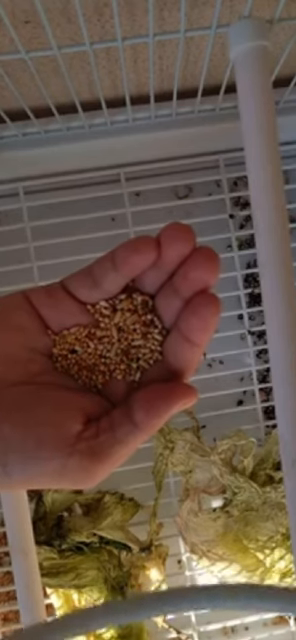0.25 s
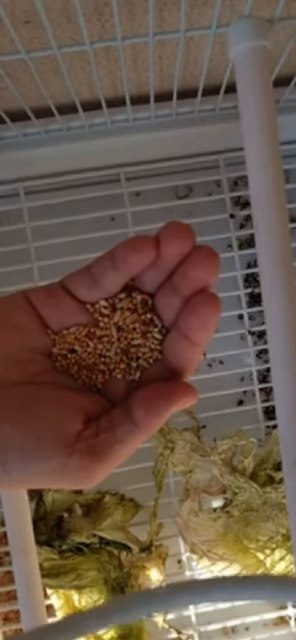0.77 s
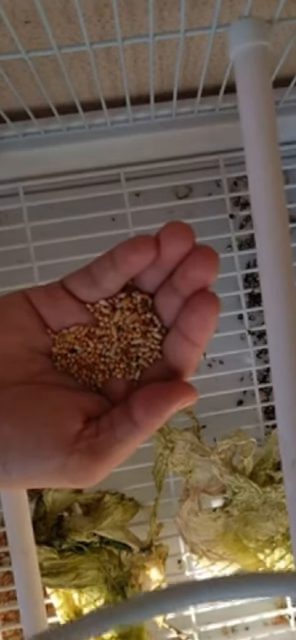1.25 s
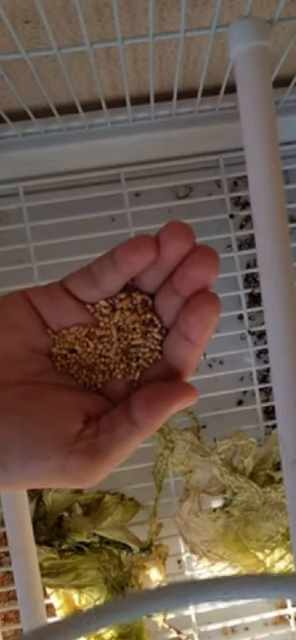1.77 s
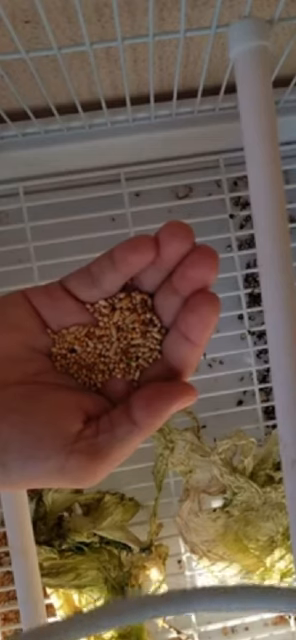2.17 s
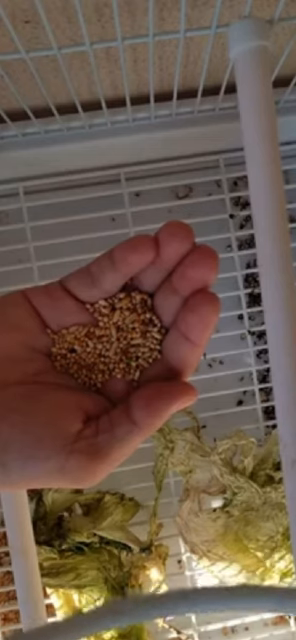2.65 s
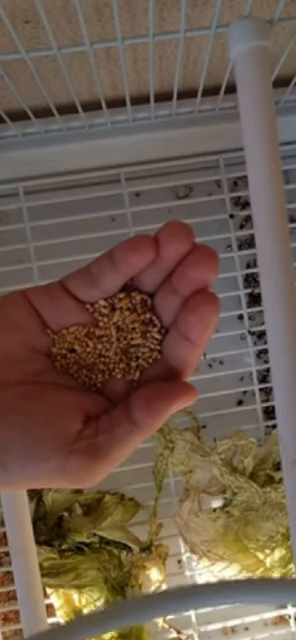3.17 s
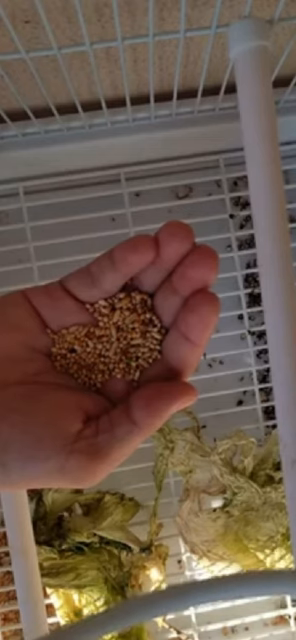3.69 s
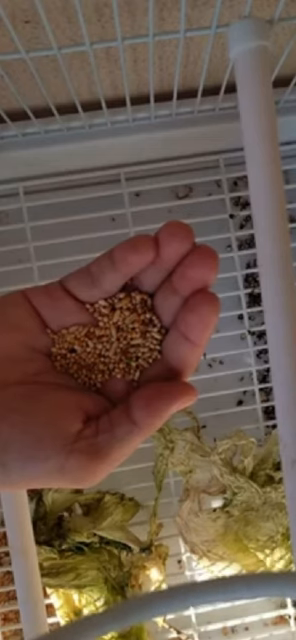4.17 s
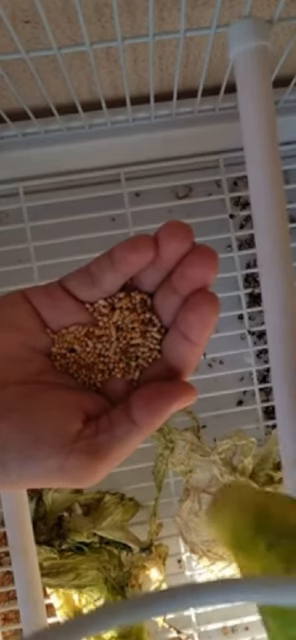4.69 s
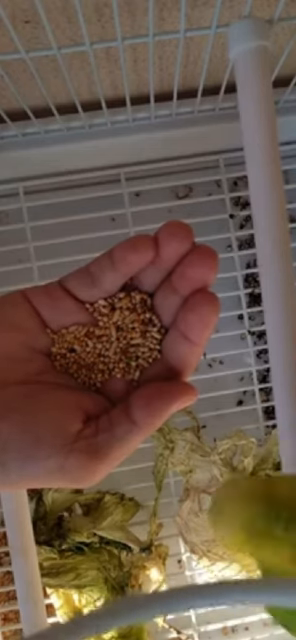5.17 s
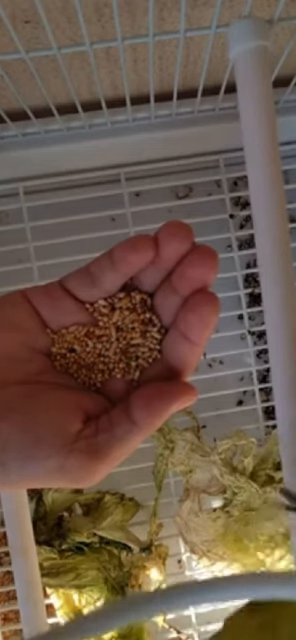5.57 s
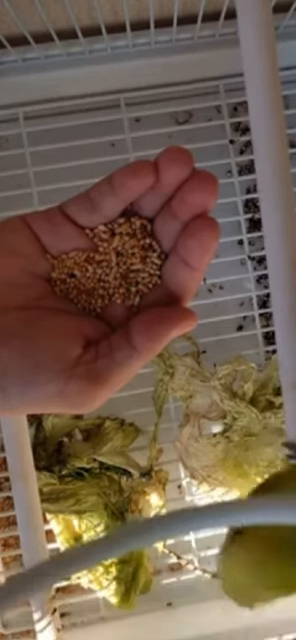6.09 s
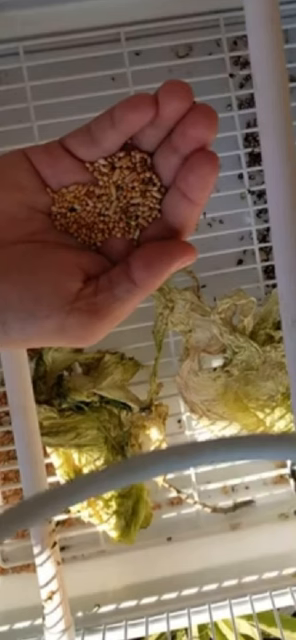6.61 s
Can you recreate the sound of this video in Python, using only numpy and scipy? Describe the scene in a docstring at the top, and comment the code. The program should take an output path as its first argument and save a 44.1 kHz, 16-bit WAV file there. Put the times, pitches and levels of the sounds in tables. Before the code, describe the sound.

Close in a small room, a budgie calls six times with quiet gaps between. A faint whistle and a light tap on the wire cage come first, then a falling raspy double chirp, a buzzy squawk, three more double chirps and a final squawk. Soft thin whistles sound farther off. Underneath lie low hum, a far engine note and distant traffic, slowly swelling.

```python
"""A small room, where a budgie calls six times in a wire cage, with thin soft whistles, and one tap
before the first call. Four calls are falling double chirps that break into rasp where the syrinx
(voice organ) runs unstable; two are buzzy rising squawks. Calls are gliding tones mixed with noisy rasp.
Behind lie a low hum, a far engine note and the slowly swelling rumble of distant traffic, made of
shaped noise and sine waves. A dull shuffle of noise surrounds the tap."""
import sys
import numpy as np
from scipy import signal
from scipy.fft import rfft, irfft, next_fast_len
from scipy.io import wavfile
from scipy.ndimage import uniform_filter1d

SR = 44100
rng = np.random.default_rng(int(sys.argv[2]) if len(sys.argv) > 2 else 0)


def unload_audio(sound):
    """Save the sound as a 16-bit wav file, at the path given as the first command line argument."""
    columns = np.transpose(np.atleast_2d(sound))
    # keep every value between -1 and 1, then stretch to whole-number steps
    steps = np.round(np.clip(columns, -1, 1) * 32767)
    wavfile.write(sys.argv[1], SR, steps.astype(np.int16))


N = 302085
TIME = np.arange(N) / SR

# Colours of noise are relative, since noise is evened to one strength: pitch_hz, level_db (per Hz)
DEEP_COLOUR = [(15, -48), (35, -25), (50, -12), (68, 1), (95, 0.5), (125, -23), (250, -70.5)]
RUMBLE_COLOUR = [(50, -43.5), (95, -14.5), (122, 1), (170, -2.5), (200, 1), (240, 0.5), (285, -3.5),
                 (335, -9.5), (420, -17.5), (550, -44), (900, -95)]
AIR_COLOUR = [(190, -45), (330, 0), (394, -4), (416, -5.5), (452, 0), (555, -4.5), (602, -1), (681, -8.5),
              (883, -6), (1480, -13), (2090, -12), (2630, -16.5), (4680, -25.5), (7050, -27), (8650, -48.5),
              (11200, -77.5), (19000, -120)]
SHUFFLE_COLOUR = [(80, -20), (180, -2), (300, 2), (600, -12), (1500, -23), (4000, -32), (8000, -51)]
TAP_COLOUR = [(500, -18), (1000, -3), (1500, 6), (2100, -3.5), (3700, -5), (7000, -12), (8600, -40)]
RASP_COLOUR = [(900, -36), (1300, -11), (1700, 6.5), (2300, 5), (3300, 6), (3900, 0.5), (4500, -23.5),
               (5800, -17.5), (7200, -12.5), (8000, -32), (9000, -40)]
# Background levels, swelling slowly with one brief sag near the end; before a small trim:
# time_s, rumble_db, tyre_and_air_db
BACKGROUND_SWELL = [(0, -41, -47), (1.5, -40.5, -45.5), (3.4, -39.5, -46.5), (4.3, -40, -44),
                    (5.1, -36.5, -42.5), (6.0, -36, -40.5), (6.5, -34.5, -40.5), (6.66, -42.5, -44.5),
                    (6.8, -32.5, -38.5)]
# Humming lines, levels relative to the rumble: pitch_hz, level_db
HUM_LINES = [(123, -13.5), (243, -10), (335, -26), (392, -17.5), (605, -27.5)]
# A far engine, before its waver: time_s, pitch_hz, level_db
ENGINE_PATH = [(0, 250, -54.5), (3.6, 252, -53), (4.0, 268, -39), (4.4, 281, -45), (5.0, 279, -46.5),
               (5.9, 273, -36.5), (6.4, 272.6, -42), (6.85, 272, -50)]
# Soft whistles, levels before flutter and distance: start_s, length_s, first_hz, last_hz, level_db,
# quaver (share of pitch)
WHISTLE_NOTES = [(0.576, 0.072, 7000, 7700, -54.5, 0.051), (1.54, 0.039, 4180, 4620, -52, 0.0366),
                 (1.582, 0.075, 5880, 5800, -51.5, 0.014), (1.734, 0.14, 3795, 3900, -47.5, .005),
                 (1.791, 0.2, 6570, 6800, -58, 0.0647), (1.891, 0.13, 3900, 3920, -53.5, 0.026),
                 (2.003, 0.14, 3900, 4020, -58.5, 0.024), (4.758, .06, 4210, 3910, -45.5, 0.031),
                 (4.801, 0.071, 3892, 4020, -54, 0.06), (4.9, 0.071, 4320, 4100, -57, 0.04),
                 (5.33, 0.068, 7164, 6400, -54, 0.029), (5.469, 0.087, 4100, 4100, -50, 0.043)]
# A tap on the cage, before a trim: start_s, level_db
TAP_HITS = [(0.699, -26.5)]
# Gain of throat and beak for the overtones, beak narrow and then wide open: pitch_hz, gain_db
NARROW_BEAK = [(3300, -13), (4100, -13.5), (4800, -35), (6200, -36), (6750, -21), (7300, -24), (7900, -44),
               (9500, -65)]
OPEN_BEAK = [(3300, -13.5), (4000, -9), (4500, -14.5), (5100, -23), (5600, -24), (6300, -17), (7300, -17),
             (8200, -45), (9500, -50)]
# Falling strokes, two to a chirp: rasp, a clear gliding tone, rasp again. Levels before the voice trims:
# tone_start_s, glide_length_s, first_hz, last_hz, tone_db, swell_over_glide_db, opening_rasp_db, closing_rasp_db
CHIRP_STROKES = [(0.995, .030, 3500, 2400, -17.5, -3, -28, -20.5),
                 (1.056, .032, 2563, 2276, -22, 8, -32, -22.5),
                 (2.693, .028, 3450, 2420, -18.5, 15, -25, -18.5),
                 (2.758, .023, 2594, 2400, -15, 1.5, -32.5, -17.5),
                 (4.229, 0.029, 3480, 2420, -20.5, 2, -27, -20),
                 (4.283, .040, 3200, 2330, -21, 1, -14.5, -18),
                 (5.147, 0.032, 3520, 2520, -17.5, 1.5, -25.5, -19.5),
                 (5.212, 0.032, 2780, 2400, -17.5, 2.5, -23, -16.5)]
# Notes of two squawks, from a low start through a buzzy middle to a clear high end. Levels before voice trims:
# start_s, length_s, first_hz, last_hz, level_db, roughness (0-1)
SQUAWK_NOTES = [(2.166, 0.0091, 1840, 1730, -23.5, .18), (2.182, 0.0105, 2830, 2630, -14, 0.3),
                (2.198, 0.01524, 2520, 2380, -13.5, 0.3), (2.224, .014, 2620, 2703, -14, 0.26),
                (2.246, 0.038, 3250, 2975, -17.5, 0.07), (6.552, 0.012, 2130, 1950, -23.5, 0.25),
                (6.57, .007, 2620, 2680, -12.5, 0.37), (6.581, 0.024, 2450, 2105, -15.5, 0.45),
                (6.614, 0.012, 2480, 2760, -12.5, 0), (6.632, 0.031, 3260, 2960, -18, 0)]
# Reflections from the cage tray and the near wall: delay_s, gain (plain factor)
NEAR_ECHOES = [(.0031, 0.052), (.0074, 0.26), (0.0128, 0.27), (0.0216, .15), (.034, 0.08)]
# Cage wires that ring along: pitch_hz, t60_s (time to fall 60 dB), gain at resonance (plain factor)
CAGE_WIRES = [(2310, 0.7, 0.6), (3080, 0.45, .55), (2020, .45, .25)]
# Brief dips in the level: start_s, end_s, level_db
LEVEL_DIPS = [(4.2632, 4.277, -49), (5.058, 5.086, -11)]

DEEP_DB, DEEP_WAVER_DB = -47, 2
SHUFFLE_S, SHUFFLE_WIDTH_S, SHUFFLE_DB = 0.676, 0.09, -37
PULSE_HZ, PULSE_SPREAD = 181.9, 0.284   # flutter of the airflow in a rough call
TONE_FLUTTER_HZ, TONE_FLUTTER_DB = 254, 2   # even a clear tone trembles in strength
OPENING_S, OPENING_ROUGH, OPENING_HZ = 0.018, 0.845, 2612   # the rasp before the tone locks in
LOCK_S = 0.005   # the switch from rasp to tone
GLIDE_ROUGH, GLIDE_BEND = 0.082, 1.4   # a higher bend makes the pitch fall earlier
BREAK_S = 0.00583   # the tone collapses into a low rasp
CLOSING_S, CLOSING_ROUGH, CLOSING_HZ, CLOSING_SAG_DB = 0.016, 0.83, 1846, 4
ATTACK_DB_PER_S, RELEASE_DB_PER_S = 2195, 2001
NOTE_EDGE_DB_PER_S, NOTE_SAG_DB = 2400.5, 1.5   # how fast a note starts and stops; its loss while held
EDGE_S = 0.015   # time allowed for a note to rise and to die
ROOM_T60_S, ROOM_DB = 0.22, -11.5
CUTOFF_HZ = 8800


def from_db(db):
    """Decibels to gain."""
    return 10 ** (np.asarray(db) / 20)


def rms_one(x):
    """Scale to unit power."""
    return x / np.sqrt(np.mean(x ** 2) + 1e-20)


def in_time(rows, t):
    """Read each column of a curve at the times t."""
    seconds, *columns = np.transpose(rows)
    return [np.interp(t, seconds, column) for column in columns]


def gain_at(spectrum, hz):
    """Gain of a spectrum at any pitch, read along a logarithmic pitch scale."""
    points = np.array(spectrum)
    return from_db(np.interp(np.log(np.maximum(hz, 1)), np.log(points[:, 0]), points[:, 1]))


def coloured(x, spectrum):
    """Strengthen and weaken the pitches in x by a spectrum, then scale to unit power."""
    hz = np.fft.rfftfreq(len(x), 1 / SR)
    return rms_one(irfft(rfft(x) * gain_at(spectrum, hz), len(x)))


def noise(spectrum, size):
    """Random noise of a given colour."""
    return coloured(rng.standard_normal(next_fast_len(size)), spectrum)[:size]


def drift(rate_hz, size):
    """Smooth chance movement with spread 1: noise with its fast changes weakened."""
    padded = next_fast_len(size + SR // 10)
    hz = np.fft.rfftfreq(padded, 1 / SR)
    smooth = rfft(rng.standard_normal(padded)) / (1 + (hz / rate_hz) ** 2)
    return rms_one(irfft(smooth, padded))[:size]


def phase_of(hz):
    """Running phase of a moving pitch."""
    return 2 * np.pi * np.cumsum(hz) / SR


def deep_drone():
    """Very low noise whose level wavers a little."""
    return from_db(DEEP_DB + DEEP_WAVER_DB * drift(5.1, N)) * noise(DEEP_COLOUR, N)


def hum(waver=0.01178, throb_db=3.5):
    """Low sine waves, each wavering in pitch and throbbing in strength."""
    total = np.zeros(N)
    for hz, level_db in HUM_LINES:
        throb = from_db(level_db + throb_db * drift(5.1, N))
        pitch = hz * (1 + waver * drift(5.1, N))
        total += throb * rms_one(np.sin(phase_of(pitch)))
    return total


def traffic(rumble_gain_db=-0.5, air_gain_db=1.5):
    """Rumble and hiss of far traffic as two shaped noises; the hum swells along with the rumble."""
    rumble_db, air_db = in_time(BACKGROUND_SWELL, TIME)
    rumble = from_db(rumble_db + rumble_gain_db) * (noise(RUMBLE_COLOUR, N) + hum())
    air = from_db(air_db + air_gain_db) * noise(AIR_COLOUR, N)
    return rumble + air


def far_engine(waver=0.0041, throb_db=3.5):
    """One sine wave that follows the engine's pitch and strength, wavering in both."""
    pitch, level_db = in_time(ENGINE_PATH, TIME)
    throb = from_db(level_db + throb_db * drift(1.1, N))
    return throb * np.sin(phase_of(pitch * (1 + waver * drift(6, N))))


def shuffle():
    """A soft, low rustle: noise that swells and fades."""
    swell = np.exp(-((TIME - SHUFFLE_S) / SHUFFLE_WIDTH_S) ** 2)
    return from_db(SHUFFLE_DB) * swell * noise(SHUFFLE_COLOUR, N)


def whistles(flutter_db=6.5):
    """Thin sine notes before and between the calls, quavering in pitch and fluttering in strength."""
    out = np.zeros(N)
    for start, length, first_hz, last_hz, level_db, quaver in WHISTLE_NOTES:
        at, size = int(start * SR), int(length * SR)
        pitch = np.linspace(first_hz, last_hz, size) * (1 + quaver * drift(300, size))
        swell = signal.windows.tukey(size, 0.5) * from_db(level_db + flutter_db * drift(60, size))
        out[at:at + size] += swell * np.sin(phase_of(pitch))
    return out


def tap(t60_s=0.11, level_db=-7.5):
    """A light knock sets the cage rattling: noise that starts at once and dies away."""
    shake = np.zeros(N)
    for start, hit_db in TAP_HITS:
        fade_db = 60 * np.abs(TIME - start) / t60_s
        shake += (TIME >= start) * from_db(hit_db + level_db - fade_db)
    return shake * noise(TAP_COLOUR, N)


def rasp_of(size, slap_hz=700, unevenness=0.3, hiss=0.55, smear_s=0.0015):
    """The membranes slap at uneven intervals; each slap rings briefly in the throat, at an even strength."""
    slap_rate = slap_hz * np.exp(unevenness * drift(400, size))
    slaps = np.diff(np.floor(np.cumsum(slap_rate) / SR), prepend=0)
    t = TIME[:SR // 200]
    ring = rng.standard_normal(len(t)) * np.exp(-t / smear_s)
    burst = rms_one(signal.fftconvolve(slaps, ring)[:size]) + hiss * rng.standard_normal(size)
    burst = coloured(burst, RASP_COLOUR)
    power = uniform_filter1d(uniform_filter1d(burst ** 2, size=120), size=120)
    return burst / np.sqrt(power + 1e-6)   # even out the strength


def syrinx(phase, pitch, beak, third_db):
    """A tone whose overtones flare as they slide through the beak resonances."""
    second = gain_at(beak, 2 * pitch) * np.sin(2 * phase)
    third = from_db(third_db) * gain_at(beak, 3 * pitch) * np.sin(3 * phase)
    return np.sin(phase) + second + third


def call(gesture, beak, buzz_hz, swing, jitter, rough_jitter, pulsing_db, third_db, rasp_db, tone_db,
         buzz_spread=0.2474):
    """A gliding tone. As it turns unstable it pulses, a slower vibration adds sidebands, and rasp takes over."""
    at, pitch, level_db, rough = gesture
    size = len(at)
    rough = np.clip(rough, 0, 1)
    pitch = pitch * (1 + (jitter + rough_jitter * rough) * drift(349, size))
    buzz = np.sin(phase_of(buzz_hz * np.exp(buzz_spread * drift(211, size))))
    pulses = np.sin(phase_of(PULSE_HZ * np.exp(PULSE_SPREAD * drift(180, size))))
    tremble = rms_one(from_db(TONE_FLUTTER_DB * drift(TONE_FLUTTER_HZ, size)))
    phase = phase_of(pitch) + swing * rough * buzz   # the buzz shakes the phase
    tone = tremble * syrinx(phase, pitch, beak, third_db)
    clear = from_db(tone_db) * np.sqrt(2 - rough - rough ** 2) * tone   # gone at full roughness
    rasp = from_db(rasp_db) * rough * rasp_of(size)
    out = np.zeros(N)
    out[at] = from_db(level_db + pulsing_db * np.cbrt(rough) * pulses) * (clear + rasp)
    return out


def stroke(start, length, first_hz, last_hz, tone_db, swell_db, opening_db, closing_db):
    """Samples, pitch, level and roughness of one stroke: rasp, falling tone, rasp."""
    begin, end = start - OPENING_S - EDGE_S, start + length + CLOSING_S + EDGE_S
    at = np.flatnonzero((TIME > begin) & (TIME < end))
    t = TIME[at] - start
    stages = [-LOCK_S, 0, length, length + BREAK_S, length + CLOSING_S]
    fall = (0.5 + 0.5 * np.cos(np.pi * np.clip(t / length, 0, 1))) ** GLIDE_BEND
    pitch = np.interp(t, stages, [OPENING_HZ, last_hz, last_hz, CLOSING_HZ, CLOSING_HZ])
    pitch += (t > 0) * (first_hz - last_hz) * fall
    levels = [opening_db, tone_db - swell_db / 2, tone_db + swell_db / 2, closing_db, closing_db - CLOSING_SAG_DB]
    level_db = np.interp(t, stages, levels)
    attack_db = ATTACK_DB_PER_S * np.maximum(-OPENING_S - t, 0)
    release_db = RELEASE_DB_PER_S * np.maximum(t - stages[-1], 0)
    rough = np.interp(t, stages, [OPENING_ROUGH, GLIDE_ROUGH, GLIDE_ROUGH, CLOSING_ROUGH, CLOSING_ROUGH])
    return at, pitch, level_db - attack_db - release_db, rough


def squawk_note(start, length, first_hz, last_hz, level_db, rough):
    """Samples, pitch, level and roughness of one squawk note: a straight glide with abrupt edges."""
    at = np.flatnonzero((TIME > start - EDGE_S) & (TIME < start + length + EDGE_S))
    t = TIME[at] - start
    held = np.clip(t, 0, length)
    pitch = first_hz + (last_hz - first_hz) * held / length
    loss_db = NOTE_SAG_DB * held / length + NOTE_EDGE_DB_PER_S * np.abs(t - held)
    return at, pitch, level_db - loss_db, rough


def budgie(throat_hz=1430):
    """Chirps with the beak narrow, squawks with it wide open; the small throat radiates little that is low."""
    chirps = sum(call(stroke(*row), NARROW_BEAK, buzz_hz=781, swing=0.57, jitter=0.01, rough_jitter=0.0742,
                      pulsing_db=2.0, third_db=-0.5, rasp_db=-2.5, tone_db=-2.0) for row in CHIRP_STROKES)
    squawks = sum(call(squawk_note(*row), OPEN_BEAK, buzz_hz=810, swing=0.21, jitter=0.022, rough_jitter=0.068,
                       pulsing_db=5.0, third_db=1.0, rasp_db=-1.5, tone_db=-3.5) for row in SQUAWK_NOTES)
    throat = signal.butter(6, throat_hz, "high", fs=SR, output="sos")
    return signal.sosfilt(throat, chirps + squawks)


def room(x, wet_db, build_s=0.0094):
    """Direct sound, a few near reflections, ringing wires and a short diffuse tail."""
    t = TIME[:SR // 2]
    fade = np.exp(-np.log(1000) * t / ROOM_T60_S)
    tail = rng.standard_normal(len(t)) * fade * (1 - np.exp(-t / build_s))
    response = from_db(wet_db) * tail / np.sqrt(np.sum(tail ** 2))
    response[0] = 1   # direct sound
    for delay, gain in NEAR_ECHOES:
        response[int(delay * SR)] += gain
    for hz, t60, gain in CAGE_WIRES:
        damping = np.log(1000) / t60
        response += 2 * gain * damping / SR * np.exp(-damping * t) * np.cos(2 * np.pi * hz * t)
    return signal.fftconvolve(x, response)[:N]


def scene(far_db=-4.0, far_wet_db=3.0):
    """The near bird and its cage; the whistles come from farther off, blurred by the room."""
    background = deep_drone() + traffic() + far_engine()
    far = from_db(far_db) * room(whistles(), far_wet_db)
    near = room(budgie() + tap(), ROOM_DB)
    return (background + shuffle() + far + near)[None]


def record(dry):
    """The level dips briefly twice; the highest pitches are cut."""
    gain = np.ones(N)
    for start, end, level_db in LEVEL_DIPS:
        gain[int(start * SR):int(end * SR)] = from_db(level_db)
    smooth_gain = uniform_filter1d(gain, size=60)
    low_pass = signal.ellip(10, 0.2, 80, CUTOFF_HZ, fs=SR, output="sos")
    return signal.sosfilt(low_pass, dry * smooth_gain)


dry = scene()
out = record(dry)
unload_audio(out)
```